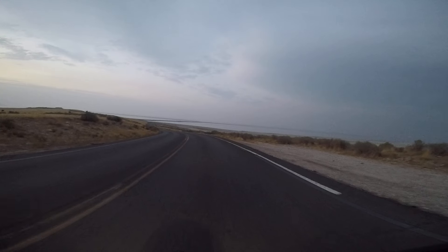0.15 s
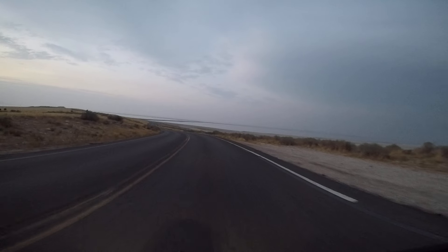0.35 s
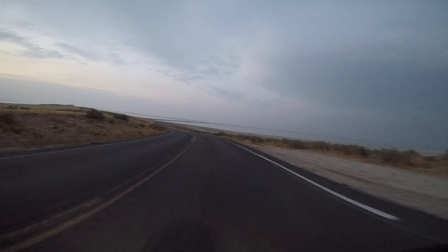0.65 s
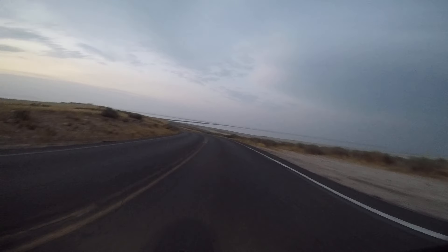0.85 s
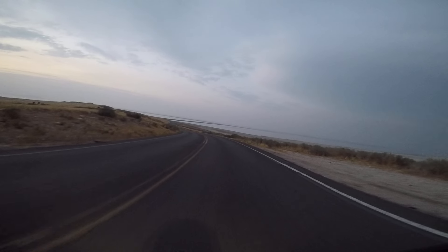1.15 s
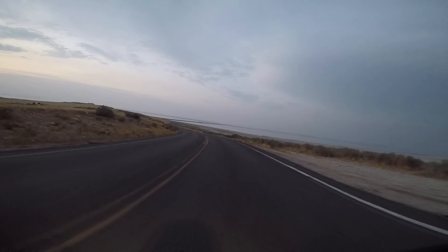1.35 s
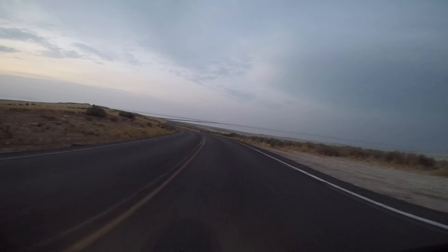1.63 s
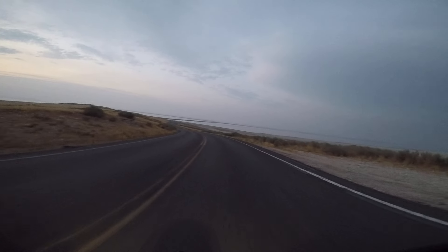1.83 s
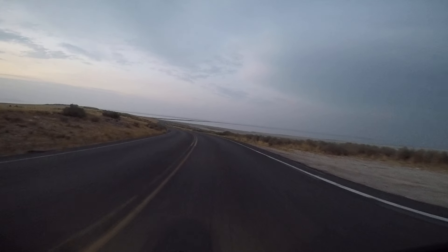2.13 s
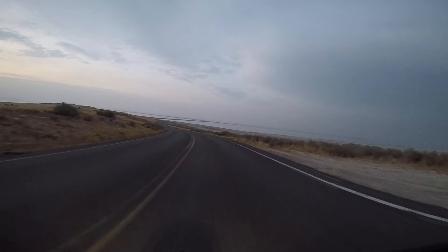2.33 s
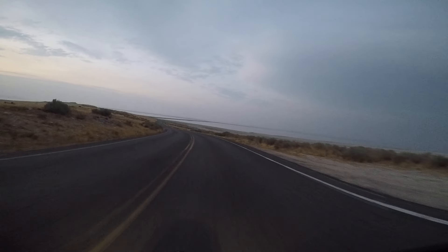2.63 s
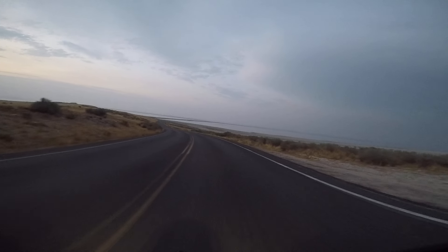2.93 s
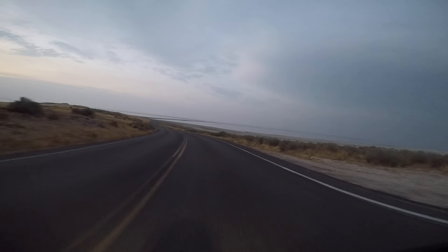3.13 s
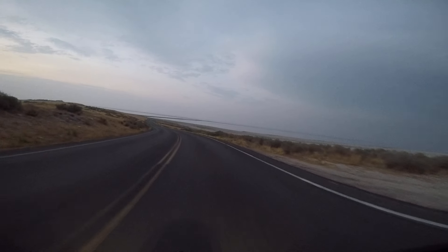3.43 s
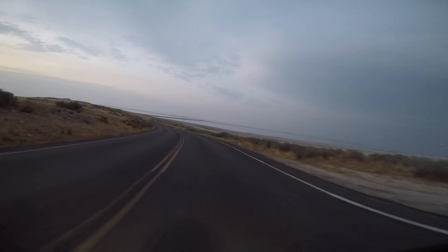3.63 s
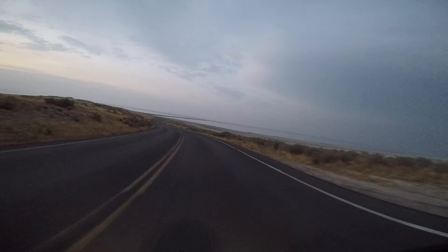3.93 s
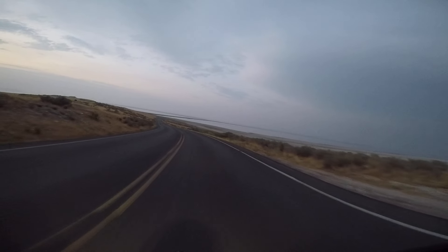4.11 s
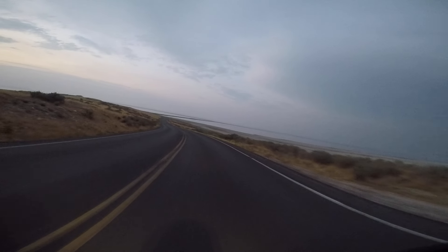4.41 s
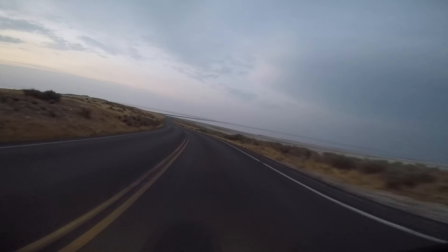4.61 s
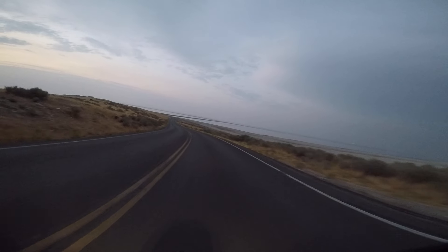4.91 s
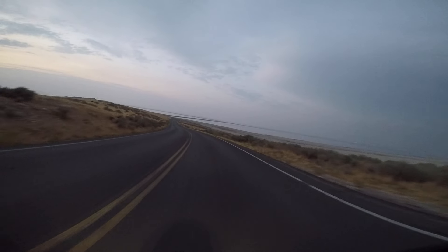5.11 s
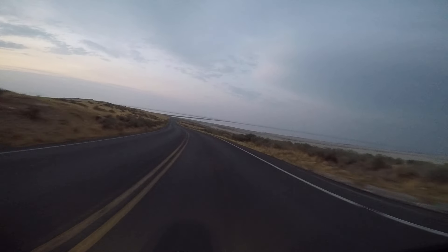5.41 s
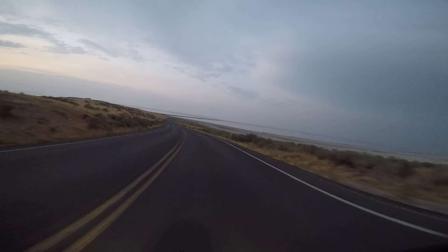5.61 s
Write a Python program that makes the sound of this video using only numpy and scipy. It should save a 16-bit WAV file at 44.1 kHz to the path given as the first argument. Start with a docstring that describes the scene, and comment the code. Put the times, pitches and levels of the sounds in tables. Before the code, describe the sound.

A few sharp snaps, then the climbing whine of an accelerating electric bike over road noise and wind buffeting the microphone.

```python
"""A few sharp snaps, then the rising hum of an electric bike speeding up on an open road.
The motor's orders force the frame to vibrate and boom as each crosses its resonances near 215 and 270 Hz.
A small camera fixed to the frame hears this amid tyre roar, turbulent wind on its microphone and
dull knocks; impacts excite the modes of its mount, which snaps, rattles and rings thinly."""
import sys
import numpy as np
from scipy import signal
from scipy.fft import rfft, irfft
from scipy.io import wavfile

SR = 44100
rng = np.random.default_rng(int(sys.argv[2]) if len(sys.argv) > 2 else 0)


def wav_record(signal):
    """Record a signal, one row per channel, as 16-bit PCM in the file named by sys.argv[1]."""
    frames = np.transpose(np.atleast_2d(signal))
    bounded = np.clip(frames, -1, 1)
    # unit amplitude maps onto the largest positive 16-bit level
    quanta = np.round(bounded * 32767).astype(np.int16)
    wavfile.write(sys.argv[1], SR, quanta)


N = 254016

# the motor's drive: (time [s], base rate [Hz], torque [dB])
RIDE = [(0, 29.1, -7), (.3, 31.6, -13), (.4, 34.53, -10.5), (.465, 36.3, -3), (.515, 37.6, -4.5),
        (.555, 37.8, 2.5), (.6, 39.17, 4), (.65, 41.3, -1.5), (.72, 42.65, -3.5), (.81, 43, 3.5),
        (.86, 44.93, -1), (.93, 45.33, 0.5), (1.04, 46.7, 2.5), (1.17, 52.14, -0.5), (1.45, 52.57, 0.5),
        (1.65, 55.75, 1), (1.85, 59.1, 3.5), (2.08, 64.9, -1), (2.4, 69.56, 4.5), (2.7, 74.13, 5.5),
        (2.87, 79.2, 4), (3.13, 84.24, 1.5), (3.2, 85.9, -0.5), (3.34, 87.23, 8), (3.47, 90.05, 6.5),
        (3.56, 93, 7), (3.72, 93.4, 5.5), (3.85, 94.95, 0.5), (4.0, 101.1, 0.5), (4.15, 106.7, 3),
        (4.58, 108.5, 1.5), (4.8, 117.5, 4.5), (5.05, 122.1, 1.5), (5.3, 125.1, 1.5), (5.55, 130.8, -3),
        (5.76, 139, -1.5)]
# gusts: (time [s], level of the frame's boom [dB], level of the wind on the microphone [dB])
GUSTS = [(0, -31.5, -32.5), (.33, -29, -27.5), (.5, -31.5, -36), (.7, -16.5, -30), (.83, -27.5, -32.5),
         (1.05, -23, -29.5), (1.5, -29, -33.5), (2.0, -28.5, -27.5), (2.25, -32, -31.5), (2.7, -13, -20),
         (2.95, -18, -24.5), (3.17, -21.5, -20), (3.3, -19, -23), (3.6, -19.5, -20), (4.0, -21, -24.5),
         (4.2, -25, -24), (4.5, -20, -23), (4.7, -20, -21), (5.0, -19.5, -22), (5.5, -13.5, -22),
         (5.76, -22, -21)]
# shaking of the mount: (time [s], rattle level [dB])
SHAKE = [(0, -53.5), (.45, -58), (.67, -55), (.8, -57), (1.15, -55), (1.6, -55.5), (1.95, -58), (2.04, -50),
         (2.17, -54), (2.3, -54.5), (2.4, -56.5), (3.1, -54), (3.3, -56), (3.75, -52.5), (4.02, -54.5),
         (4.45, -49.5), (4.85, -53), (5.25, -51), (5.54, -49.5), (5.76, -51.5)]
# resonances of the mount: (frequency [Hz], bandwidth [Hz], gain [dB])
MOUNT_MODES = [(5465, 190, 2), (6020, 140, 2), (7070, 150, -15), (8180, 390, -13)]
WHISTLE_HZ, WHISTLE_WIDTH_HZ = 4520, 75
MID_SPEED_HZ = 70   # base rate at mid speed


def motor():
    """Forced vibration: each order is an unsteady sine, weighted by the frame's response at its pitch."""
    # one entry an order: (multiple of the base rate [ratio])
    orders = [1.6, 1.7, 1.8, 1.9, 2, 3, 3.6, 4, 5.4, 6, 6.3, 7.2, 8.1, 9, 9.9, 10.8, 12.6, 18]
    # each order's force at mid speed: (level [dB])
    forces = [-23.5, -29.5, -12.5, -14, -11.5, -14.5, -32.5, -25, -32.5, -19.5, -44.5, -33.5, -43.5, -34.5,
              -44.5, -41, -42.5, -43]
    # its growth with speed: (slope [dB per doubling])
    growths = [1.5, -3, 7, -4.5, 4.5, -4.5, 18, -3, 7.5, -12, 5, 12, 7, 8.5, 9, 10, 11.5, 9]
    # its unsteadiness: (level spread [dB])
    wavers = [3, 3, 2, 3, 1.5, 1.2, 2.5, 1.5, 4, 1.3, 5, 3, 5, 3, 5, 3.5, 5, 4.5]
    # its blur: (phase spread [rad])
    blurs = [.5, .35, .25, .45, .2, .12, .4, .2, .6, .12, .9, .45, 1, .5, 1.2, .6, 1.5, 1.6]
    # transfer through the frame to the camera: (frequency [Hz], gain [dB])
    frame_response = [(60, -30), (130, -32), (175, -18.5), (200, -14.5), (217, -4), (238, -19), (268, -1),
                      (292, -11), (320, -13.5), (333, -13), (345, -20), (360, -16), (385, -19.5),
                      (415, -33.5), (490, -25), (600, -22.5), (780, -19), (900, -27), (1130, -18.5),
                      (1350, -17), (1800, -32.5), (2180, -18), (2400, -39.5)]
    # throb that the lowest orders share at speed: (time [s], level change [dB])
    throb = [(3.7, -0.5), (3.8, -5.5), (3.87, 12.5), (3.9, 7), (3.935, -3), (4.0, -4), (4.048, 5),
             (4.086, -9), (4.125, 5), (4.152, -2), (4.184, 6.5), (4.206, -3), (4.238, 5.5), (4.272, -4.5),
             (4.345, -4.5), (4.37, -1.5), (4.52, 0), (4.57, -8), (4.62, 6), (4.68, -7.5), (4.706, 2),
             (4.742, -16), (4.776, 9), (4.81, -6.5), (4.874, 1), (4.902, -13), (4.95, -0.5), (5.022, -4.5),
             (5.064, 3), (5.114, -6.5), (5.146, 3.5), (5.2, -7.5), (5.27, 0), (5.304, -12), (5.342, 6.5),
             (5.386, -3), (5.428, 5), (5.45, 1.5), (5.57, 3.5), (5.596, -8), (5.624, -2.5), (5.76, 7.5)]
    base_hz, torque_db = in_time(RIDE)
    turns = np.cumsum(base_hz) / SR
    speed, throb_db = doublings(), in_time(throb)[0]
    out = np.zeros(N)
    for order, force_db, growth_db, waver_db, blur in zip(orders, forces, growths, wavers, blurs):
        waver_hz = 28 if order > 6.1 else 9.6   # high orders break up faster
        phase = 2 * np.pi * (order * turns + rng.random()) + blur * drift(waver_hz)
        level_db = force_db + growth_db * speed + at_hz(frame_response, order * base_hz)
        level_db += waver_db * drift(waver_hz) + singing_db(order)
        out += amp(level_db + throb_db * (order <= 2)) * np.sin(phase)
    return np.sqrt(2) * amp(torque_db) * out


def singing_db(order):
    """Amplitude modulation: an order sings out or drops away in brief bell-shaped swells."""
    # swells and dips, by order: (time [s], level change [dB])
    swells = {6: [(1.72, -6), (1.79, -6), (1.96, -4), (2.1, -6), (2.18, -6)], 5.4: [(2.9, 5), (3.4, 2.5),
              (4.1, 7), (4.48, 6)], 7.2: [(3.15, 10), (3.6, 5), (4.23, 12.5), (4.33, 6), (4.48, 8.5),
              (4.6, 4), (4.8, 7.5), (5.07, 6.5), (5.23, 1)], 9: [(2.9, 8), (3.3, 3), (4.3, 2), (4.79, 8.5),
              (5.03, 8.5), (5.14, 8), (5.3, 11), (5.5, 7)], 10.8: [(4.46, 9), (4.81, 9), (4.89, 9),
              (5.12, 6.5)]}
    half_width_s, step = 0.026, 64
    t = np.arange(0, N, step) / SR
    change_db = np.zeros(len(t))
    for s, rise_db in swells.get(order, []):
        change_db += rise_db * np.exp(-((t - s) / half_width_s) ** 2)
    return np.repeat(change_db, step)[:N]


def moan():
    """A linear chirp in a Gaussian envelope: a low tone swells under the hum and stops."""
    start_s, rise_s, fall_s = 4.82, 0.19, 0.043   # time of the peak; times to rise and fall 20 dB
    peak_db, hz, glide_hz_per_s = -16, 166.6, 220
    t = np.arange(N) / SR - start_s
    level_db = peak_db - 20 * np.where(t < 0, t / rise_s, t / fall_s) ** 2
    phase = 2 * np.pi * (hz + glide_hz_per_s * t / 2) * t
    return np.sqrt(2) * amp(np.maximum(level_db, -200)) * np.sin(phase)


def boom():
    """Random excitation: road and gusts shake the frame's lowest mode into narrow-band noise."""
    mid_hz, sag_hz_per_doubling, sag_hz_per_db = 38.34, 6, 0.32   # sinks with speed and in strong gusts
    level_db = in_time(GUSTS)[0]
    hz = mid_hz - sag_hz_per_doubling * doublings() - sag_hz_per_db * swing(level_db)
    phase = 2 * np.pi * np.cumsum(hz) / SR
    noise = drift(17) * np.cos(phase) + drift(13) * np.sin(phase)
    return amp(level_db) * rms_one(noise + 0.21 * np.sin(phase))


def wind():
    """Turbulence: lumpy low-frequency pressure on the microphone port."""
    # pressure spectrum: (frequency [Hz], relative density [dB])
    spectrum = [(15, 1.5), (30, 3.5), (55, 0.5), (80, 7.5), (130, 1.5), (250, -8.5), (500, -42.5),
                (1000, -71)]
    flutter_db, lumps_db = 1, 1.5
    level_db = in_time(GUSTS)[1] + flutter_db * drift(7.9)
    lumps = amp(lumps_db * drift(6.0))
    return amp(level_db) * rms_one(colour(rng.standard_normal(N) * lumps, spectrum))


def tyre():
    """Roughness excitation: tread on stony asphalt roars, buffeting more in its lower band."""
    # spectrum of the roar: (frequency [Hz], relative density [dB])
    spectrum = [(100, -27.5), (170, 4), (217, 15.5), (270, 6), (350, 9.5), (412, -1.5), (472, 4), (680, -2),
                (1050, 2), (1500, -5.5), (2100, -13), (2500, -21.5), (3200, -31.5), (9000, -73.5)]
    # buffeting of the lower band: (time [s], level change [dB])
    buffets = [(2.4, 1), (2.55, 4.5), (2.65, 0), (2.76, 3), (2.9, 5), (3.02, 0), (3.65, -0.5), (3.75, 4.5),
               (3.85, 1)]
    low_db = roar_db(mid_db=-36.5, growth_db=4, wind_share=0.15, shake_share=0.03, flutter_db=0.7)
    low_db += in_time(buffets)[0]
    high_db = roar_db(mid_db=-37, growth_db=3.5, wind_share=0.2, shake_share=0.49, flutter_db=0.62)
    road = rms_one(rng.standard_normal(N) + 0.048 * grit(370, spread_db=8.5))
    roar = colour(road, spectrum)
    low = signal.sosfilt(signal.butter(2, 750, fs=SR, output="sos"), roar)
    high = (roar - low) * amp(0.7 * drift(8.3))
    low *= amp(2.25 * drift(6.3))
    low /= np.std(band(low, 430, 750))   # each level refers to the band given here
    high /= np.std(band(high, 750, 2500))
    return amp(low_db) * low + amp(high_db) * high


def roar_db(mid_db, growth_db, wind_share, shake_share, flutter_db):
    """Power law: tyre noise gains growth_db per doubling of speed, and swells with wind and shaking."""
    swell_db = wind_share * swing(in_time(GUSTS)[1]) + shake_share * swing(in_time(SHAKE)[0])
    return mid_db + growth_db * doublings() + swell_db + flutter_db * drift(8.0)


def snaps():
    """Impact excitation: short noise bursts ring the modes of mount, camera body and housing."""
    # snaps of the mount: (time [s], gain [dB], body trim [dB], thump trim [dB], top ring trim [dB])
    events = [(0.0122, -29, 6, -12, -0.5), (0.1406, -28.5, -1.5, 1.5, -3), (0.25, -46, 6, 4, -6),
              (0.2643, -30.5, -1, -1.5, -1), (0.775, -43, -5, -11.5, -3), (1.3347, -33, 5.5, 1, 0.5),
              (1.4905, -49.5, 9.5, -3, -2), (1.57, -51, -2, -8, -5), (1.635, -53, -4, -10, -3),
              (1.715, -48, 0, -10, -3), (1.8412, -43, 5, -12, -7), (1.988, -45.5, 5, -3, -2),
              (2.0162, -29, 2, -2, 1.5), (2.176, -48.5, 6, -10, -11), (2.219, -46, 2, -10, -8),
              (2.2699, -49, -9, -10, -2), (2.295, -60, -10, -12, -5), (2.322, -53, -4, -10, -3),
              (2.4145, -43.5, 11.5, -5, -4), (2.5565, -43, 3.5, -0.5, -2.5), (2.797, -49, -3.5, 0, -2),
              (2.965, -41, 2.5, 6, -6), (3.1015, -44.5, 8.5, 2, -6.5)]
    # modes of the camera body: (frequency [Hz], bandwidth [Hz], gain [dB])
    body_modes = [(1040, 400, 2), (1610, 320, -1), (1870, 224, -2)]
    # low modes of the housing: (frequency [Hz], bandwidth [Hz], gain [dB])
    thump_modes = [(464, 350, 3), (750, 237, 5.5)]
    # highest modes of the mount: (frequency [Hz], bandwidth [Hz], gain [dB])
    top_modes = [(6810, 980, 0), (8100, 670, -0.5), (9540, 1300, -17)]
    rise_s, hold_s, bright_t60_s, dull_t60_s = .002, .0045, .026, .04
    out, t = np.zeros(N), np.arange(4000) / SR
    decay_db = -60 * np.maximum(t - hold_s, 0) / [[bright_t60_s], [dull_t60_s]]
    envelopes = np.minimum(t / rise_s, 1) * amp(decay_db)
    ring_modes = [(hz, 3.8 * width_hz, gain_db) for hz, width_hz, gain_db in MOUNT_MODES[:2]]
    ring_modes.append((WHISTLE_HZ, WHISTLE_WIDTH_HZ, 0.5))
    for s, gain_db, body_db, thump_db, top_db in events:
        bright, dull = rng.standard_normal((2, len(t))) * envelopes
        ring = amp(10) * strike(bright, ring_modes)
        top = amp(8 + top_db) * strike(bright, top_modes)
        click = amp(-10.5) * band(bright, 3400, 11000)
        body = amp(13 + body_db) * strike(dull, body_modes)
        thump = amp(16 + thump_db) * strike(dull, thump_modes)
        at = round(s * SR)
        out[at:at + len(t)] += amp(gain_db) * (ring + top + click + body + thump)
    return out


def knocks():
    """Damped free vibration: a dull blow rings a frame mode and its overtone for a few cycles."""
    # blows through the frame: (time [s], level [dB], pitch [Hz])
    blows = [(0.102, -30, 1350), (0.126, -29, 990), (0.181, -31, 1310), (0.316, -26.5, 1056),
             (2.44, -18, 847), (2.519, -17.5, 608.7), (2.744, -17, 587.4), (2.856, -19, 638.7),
             (2.891, -18, 669), (4.77, -20, 602.5)]
    rise_s, t60_s, overtone_ratio, overtone_db = .0004, 0.019, 1.5, -14
    out, t = np.zeros(N), np.arange(3000) / SR
    for s, level_db, hz in blows:
        at, phase = round(s * SR), 2 * np.pi * hz * t
        tone = np.sin(phase) + amp(overtone_db) * np.sin(overtone_ratio * phase)
        out[at:at + len(t)] += amp(level_db - 60 * t / t60_s) * np.minimum(t / rise_s, 1) * tone
    return out


def rattle():
    """Contact noise: flurries of tiny impacts drive the mount's resonances, each flaring on its own."""
    # broad response of the mount: (frequency [Hz], gain [dB])
    response = [(2000, -20), (3200, -6.5), (4400, -0.5), (5800, -4), (6900, -9.5), (10300, -16.5),
                (11500, -31), (15000, -65.5)]
    contacts = rng.standard_normal(N) + .8 * grit(600, spread_db=3.0)
    flurries = contacts * amp(1.7 * drift(30))
    out = colour(flurries, response)
    for hz, width_hz, gain_db in MOUNT_MODES:
        flare = amp(3.0 * drift(7.0))
        out += resonate(flurries * flare, hz, width_hz) * amp(gain_db + 0.5)
    return amp(in_time(SHAKE)[0]) * rms_one(out)


def whistle():
    """Narrow resonance: tiny contacts are filtered into a thin, grainy, flickering ring."""
    # course of the whistle: (time [s], level [dB])
    levels = [(0, -68), (.2, -74), (1.0, -76.5), (1.12, -60), (1.2, -72), (1.4, -62), (1.52, -75),
              (1.95, -72), (2.15, -60), (2.28, -66), (2.4, -72.5), (2.9, -73), (3.15, -63), (3.3, -70.5),
              (3.53, -58.5), (3.7, -62), (3.9, -71), (4.05, -61.5), (4.24, -61.5), (4.32, -65), (4.42, -57),
              (4.55, -56), (4.78, -64), (4.88, -71.5), (5.08, -59.5), (5.16, -71), (5.25, -49), (5.36, -63),
              (5.5, -54.5), (5.76, -61)]
    flicker_db = 1.5
    contacts = rng.standard_normal(N) + .8 * grit(1500, spread_db=3.0)
    ring = resonate_twice(contacts, WHISTLE_HZ, WHISTLE_WIDTH_HZ)
    return amp(in_time(levels)[0] + flicker_db * drift(32)) * rms_one(ring)


def hiss():
    """Band-limited noise: a faint even hiss in the top octave, fading late in the ride."""
    # course of the hiss: (time [s], level [dB])
    levels = [(0, -69), (3.6, -68.5), (4.5, -90.5), (5.76, -90.5)]
    # (frequency [Hz], relative density [dB])
    spectrum = [(7000, -18.5), (10000, 8.0), (12000, -4.5), (14000, -2.5), (15200, -18.0)]
    return amp(in_time(levels)[0]) * rms_one(colour(rng.standard_normal(N), spectrum))


def strike(burst, modes, uneven_db=1.5):
    """Modal superposition: one burst rings every mode, each with a chance strength of its own."""
    return sum(resonate_twice(burst, hz, width_hz) * amp(gain_db + uneven_db * rng.standard_normal())
               for hz, width_hz, gain_db in modes)


def resonate(x, hz, width_hz):
    """Two-pole resonance with gain 1 at its peak."""
    r = np.exp(-np.pi * width_hz / SR)
    feedback = [1, -2 * r * np.cos(2 * np.pi * hz / SR), r * r]
    return signal.lfilter(np.array([1, 0, -1]) * (1 - r * r) / 2, feedback, x)


def resonate_twice(x, hz, width_hz):
    """Resonances in cascade: a second, twice as wide, steepens the skirts."""
    return resonate(resonate(x, hz, width_hz), hz, 2 * width_hz)


def band(x, low_hz, high_hz):
    """Causal band-pass."""
    return signal.sosfilt(signal.butter(2, [low_hz, high_hz], "band", fs=SR, output="sos"), x)


def colour(x, spectrum):
    """Spectral shaping by a table, 60 dB lower below half its first frequency."""
    hz = np.maximum(np.fft.rfftfreq(N, 1 / SR), 1)
    gain_db = at_hz(spectrum, hz) - 60 * (hz < spectrum[0][0] / 2)
    return irfft(rfft(x) * amp(gain_db), N)


def grit(per_s, spread_db):
    """Poisson process: small impacts of uneven size."""
    sizes = amp(spread_db * np.minimum(rng.exponential(1, N), 5)) * rng.choice([-1, 1], N)
    return sizes * (rng.random(N) < per_s / SR)


def drift(rate_hz):
    """Low-passed noise: a random wander of spread 1, mostly slower than rate_hz."""
    step, settle = 40, 2000
    r = np.exp(-2 * np.pi * step * rate_hz / SR)
    noise = rng.standard_normal(N // step + settle + 2)
    slow = signal.lfilter([1], [1, -2 * r, r * r], noise)[settle:]
    return np.interp(np.arange(N) / step, np.arange(len(slow)), rms_one(slow))


def doublings():
    """Speed in doublings above mid speed."""
    return np.log2(in_time(RIDE)[0] / MID_SPEED_HZ)


def swing(level_db):
    """Deviation of a level from its mean."""
    return level_db - level_db.mean()


def in_time(rows):
    """Columns of a time table, interpolated to one value a sample."""
    s, *columns = np.transpose(rows)
    return [np.interp(np.arange(N) / SR, s, column) for column in columns]


def at_hz(spectrum, hz):
    """Read a spectrum table on a log-frequency axis."""
    table_hz, level_db = np.transpose(spectrum)
    return np.interp(np.log(hz), np.log(table_hz), level_db)


def amp(db):
    """Decibels to amplitude ratio."""
    return 10 ** (np.asarray(db) / 20)


def rms_one(x):
    """Scale to rms 1."""
    return x / np.sqrt(np.mean(x ** 2) + 1e-20)


def scene():
    """Superposition: all sources add at the one microphone."""
    background = tyre() + wind() + boom() + rattle() + whistle() + hiss()
    return (motor() + moan() + snaps() + knocks() + background)[None]


def record(dry):
    """Soft saturation rounds the peaks; a steep low-pass cuts the top."""
    ceiling, cutoff_hz = 1.1, 15200
    rounded = ceiling * np.tanh(dry / ceiling)
    return signal.sosfilt(signal.cheby2(12, 70, cutoff_hz, fs=SR, output="sos"), rounded)


dry = scene()
out = record(dry)
wav_record(out)
```